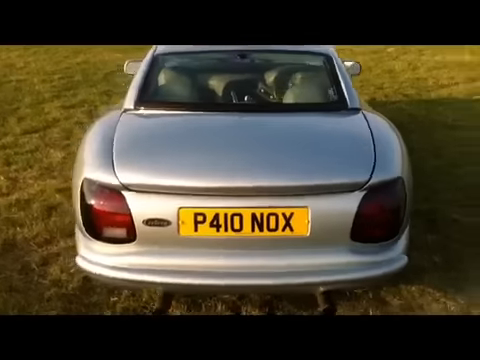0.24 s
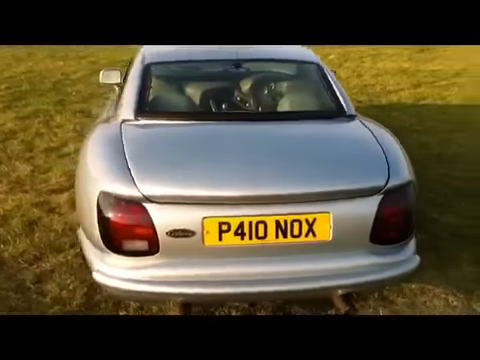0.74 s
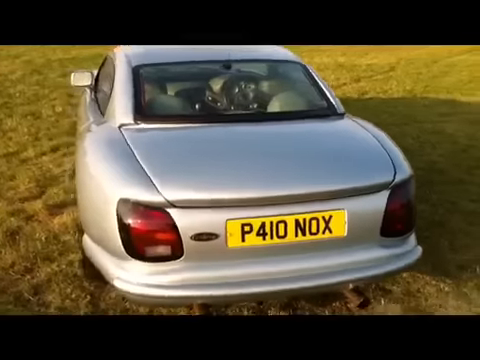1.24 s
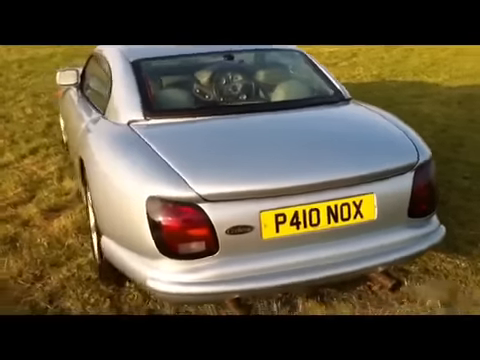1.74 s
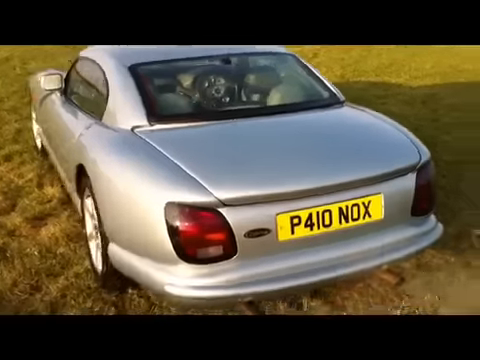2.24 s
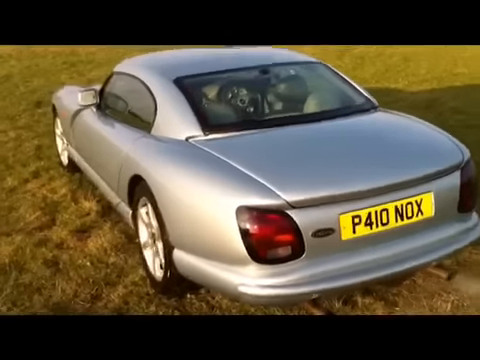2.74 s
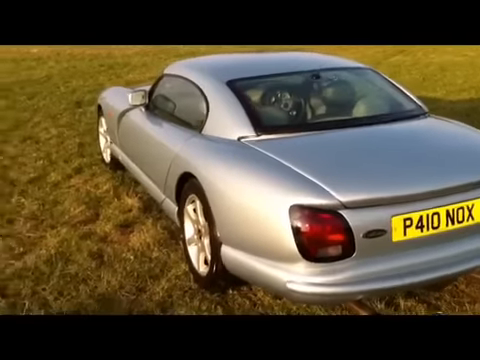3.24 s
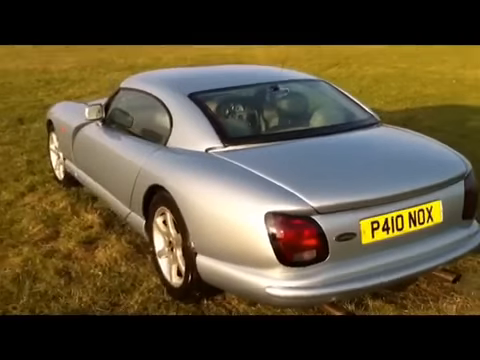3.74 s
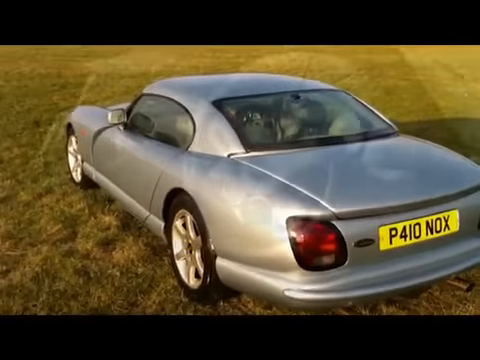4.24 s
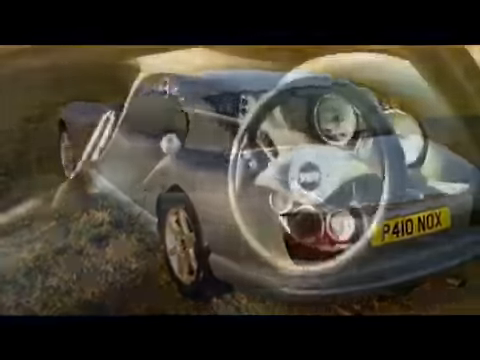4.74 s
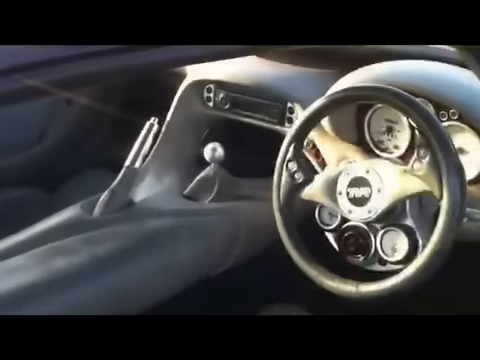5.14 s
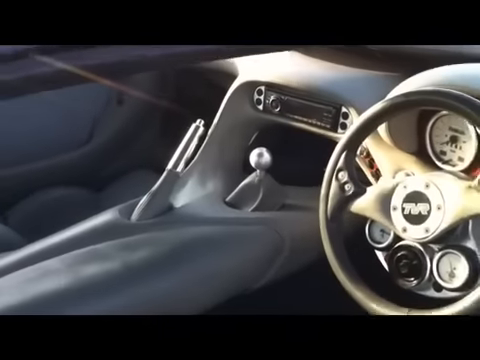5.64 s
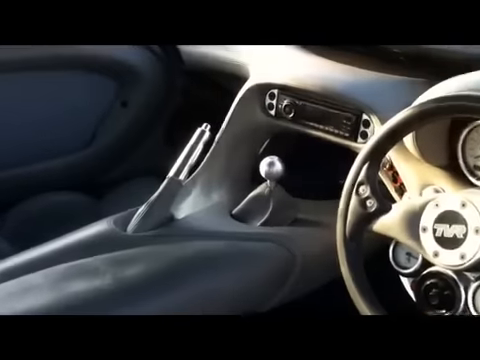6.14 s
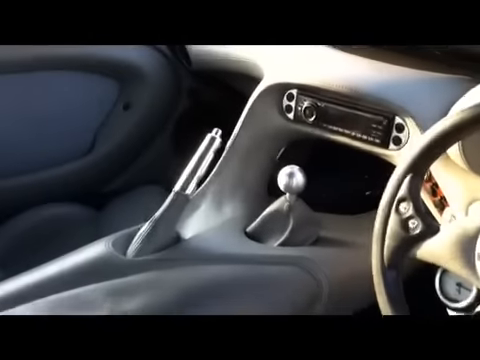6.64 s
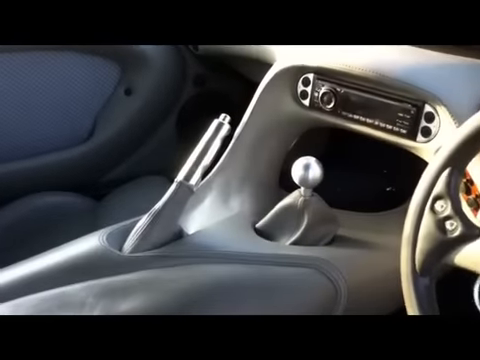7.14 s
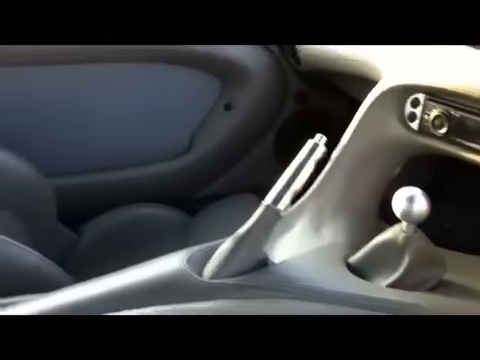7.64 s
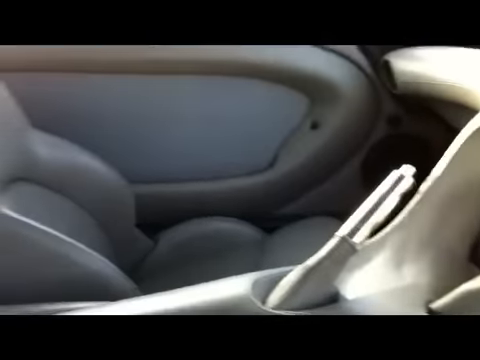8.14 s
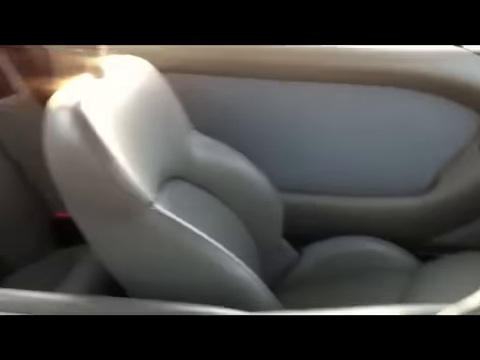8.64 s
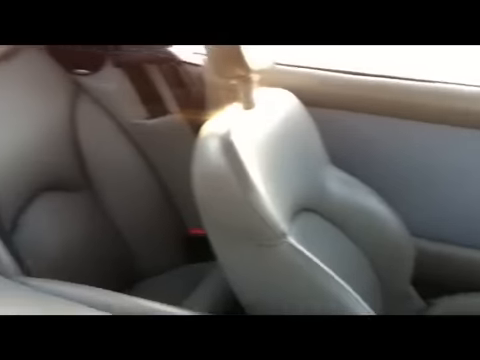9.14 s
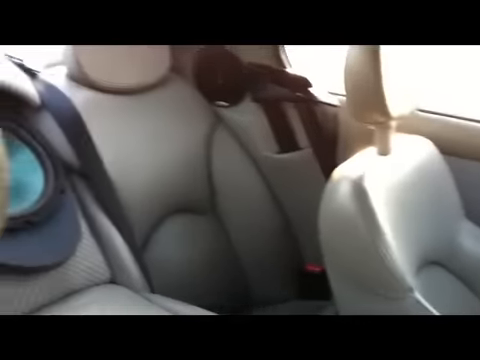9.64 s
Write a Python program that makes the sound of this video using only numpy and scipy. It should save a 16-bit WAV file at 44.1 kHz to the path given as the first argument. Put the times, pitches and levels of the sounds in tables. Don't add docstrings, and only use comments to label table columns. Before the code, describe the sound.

Outdoors on grass, a handheld microphone circles the tail pipes of an idling V8. A deep uneven burble spits and whistles, wind bursts hard on the microphone, and grass swishes and snaps underfoot. Around five seconds it crossfades to the cabin: smoother low boom, valve clatter, tappets and hiss, with two scratchy taps near the end.

```python
import sys
import numpy as np
from scipy import signal
from scipy.fft import rfft, irfft, next_fast_len
from scipy.io import wavfile
from scipy.ndimage import uniform_filter1d, minimum_filter1d, map_coordinates

SR = 44100
rng = np.random.default_rng(int(sys.argv[2]) if len(sys.argv) > 2 else 0)


def decibels_to_gain(level_db):
    exponent = np.asarray(level_db, float) / 20
    return 10 ** exponent


def output_pcm(signal):
    pcm = np.clip(np.atleast_2d(signal).T, -1, 1) * 32767
    wavfile.write(sys.argv[1], SR, np.round(pcm).astype(np.int16))


N = 435708
T = np.arange(N) / SR
CABIN_IN_S, REAR_OUT_S = 4.175, 5.17
REAR, CABIN = T < REAR_OUT_S, T > CABIN_IN_S
BOTH = np.sqrt(1. * REAR + CABIN)
REAR_HZ, CABIN_HZ = 34.61, 35.16

# start [s], peak [dB], low and high whistle [Hz].
SPIT_EVENTS = [(0.043, -40.5, 1120, 2150), (0.086, -23.5, 1200, 2630), (0.1253, -28.5, 1324, 2700),
               (0.1935, -31, 1100, 2230), (0.2637, -35.5, 1235, 2730), (0.464, -28, 1330, 2340),
               (0.5912, -28.5, 1190, 2270), (0.9323, -29.5, 1060, 2440), (1.4166, -31.5, 1865, 2820),
               (1.472, -29, 1180, 2470), (1.5196, -20.5, 1036, 2300), (1.796, -30.5, 1330, 2700),
               (1.8545, -32, 1120, 2570), (1.939, -31.5, 1596, 2700), (1.9979, -29.5, 1240, 2430),
               (2.142, -29.5, 1300, 2400), (2.2291, -28, 1190, 2610), (2.364, -29, 1370, 2420),
               (2.54, -30, 1700, 2610), (2.7159, -31.5, 1720, 3120), (2.8132, -29.5, 1376, 3040),
               (3.0592, -27, 1750, 3230), (3.186, -31, 1236, 3280), (3.4112, -26, 1113, 3100),
               (3.9833, -30.5, 1170, 2210), (4.053, -29, 1600, 3680), (4.142, -27.5, 1630, 3200),
               (4.568, -29.5, 1180, 2500), (4.835, -31.5, 1450, 2510), (5.0716, -27, 1565, 3280)]
# frequency [Hz], level [dB].
HISS_COLOUR = [(2650, -7.5), (4500, 3), (5400, 5), (5960, 4), (7970, -0.5), (9760, 2), (11500, 0.5),
               (12600, 0.5), (15600, -11.5)]


def unit(x):
    return x / np.sqrt(np.mean(x ** 2) + 1e-20)


def curves(rows):
    s, *cols = np.transpose(rows)
    return [np.interp(T, s, c) for c in cols]


def wobble(rate_hz):
    coarse = T[::32]
    knots = rng.standard_normal(int(N * rate_hz / SR) + 4)
    return np.interp(T, coarse, map_coordinates(knots, [coarse * rate_hz]))


def filtered(x, response):
    m = next_fast_len(N + SR // 2)
    return irfft(rfft(x, m) * response(np.fft.rfftfreq(m, 1 / SR)), m)[:N]


def ringing(x, modes):
    def response(f):
        total = 0
        for k, (centre, width, db) in enumerate(modes):
            damping = 1j * f * width
            total = total + (-1) ** k * decibels_to_gain(db) * damping / (centre * centre - f * f + damping)
        return total
    return filtered(x, response)


def shaped(x, spectrum):
    f, db = np.transpose(spectrum)
    return filtered(x, lambda hz: decibels_to_gain(np.interp(np.log(hz + 1), np.log(f), db)))


def noise(spectrum):
    return unit(shaped(rng.standard_normal(N), spectrum))


def patchy(x, depth_db):
    z = signal.stft(x, nperseg=512)[2]
    field = uniform_filter1d(rng.standard_normal(z.shape), size=14, axis=0)
    field = uniform_filter1d(field, size=6, axis=1)
    return unit(signal.istft(z * decibels_to_gain(depth_db * unit(field)), nperseg=512)[1][:N])


def pulses(times_s, sizes):
    return np.bincount(np.clip(np.round(times_s * SR).astype(int), 0, N - 1), sizes, N)


def dying(x, t60):
    return signal.lfilter([1], [1, -decibels_to_gain(-60 / (t60 * SR))], x)


def swells(rows, rise, fall):
    s, length, db = np.transpose(rows)[:3, ..., None]
    coarse = T[::64]
    below_db = rise * np.maximum(s - coarse, 0) + fall * np.maximum(coarse - s - length, 0)
    return coarse, decibels_to_gain(db - below_db)


def firings(bank_hz, first, lag, far_db, scatter_db, jitter):
    beats = np.arange(int(36 * N / SR))
    near = first + beats / bank_hz + 0.002074 * np.interp(beats / bank_hz, T, wobble(2.2))
    chance = rng.standard_normal((len(beats), 4))
    one = pulses(near + jitter * chance[:, 0], decibels_to_gain(scatter_db * chance[:, 1]))
    far = near + lag / bank_hz + jitter * chance[:, 2]
    other = pulses(far, decibels_to_gain(far_db + scatter_db * chance[:, 3]))
    return unit(one + other)


def engine_levels(gust_db):
    # time [s], nearness to the exhaust [dB], facing the tail pipe [dB].
    camera_path = [(0, -22, 2), (.5, -28.5, 10.5), (.8, -21.5, 0.5), (.95, -22.5, 10), (1.12, -23, 0.5),
                   (1.5, -28, 8.5), (1.7, -25, 5.5), (2.2, -22.5, 3), (2.9, -23.5, 0), (3.5, -23, 4.5),
                   (3.93, -26.5, 3.5), (4.2, -21.5, 3), (5.14, -19.5, 3), (5.2, -40, 12.5),
                   (5.3, -26.5, 6.5), (6.5, -27.5, 4), (7.6, -29, -2.5), (9.88, -27.5, -4)]
    # start [s], length [s], lift of the hiss [dB].
    swish_events = [(.205, 0.031, -0.5), (.37, 0.1, 12), (.658, 0.02, 10.5), (.93, 0.048, 7),
                    (1.23, 0.036, 8.5), (1.402, 0.3, 2.5), (1.617, 0.1, 5.5), (1.753, 0.13, 4),
                    (2.01, 0.012, 10.5), (2.154, 0.059, 10), (2.53, 0.022, 5), (2.8, 0.077, 4.5),
                    (3.054, 0.05, 3), (3.176, 0.066, 10.5), (3.381, 0.14, 9.5), (3.629, 0.071, 9.5),
                    (3.772, 0.12, 5), (3.97, 0.026, 10), (4.04, 0.3, 4.5), (5.12, 0.025, 2.5)]
    boom_db, facing_db = curves(camera_path)
    pipe_db = boom_db + facing_db
    calm_db = -26
    swing_db = uniform_filter1d(pipe_db, size=SR // 2) - calm_db
    coarse, gains = swells(swish_events, rise=800, fall=790)
    lift_db = 0.52 * np.interp(T, coarse, 20 * np.log10(np.maximum(gains.max(axis=0), 1)))
    gear_db = np.where(REAR, -41.5, -43) + np.where(REAR, 0.026, -0.14) * swing_db + lift_db
    hiss_db = np.where(REAR, -60, -56.5) + 0.24 * swing_db * ~REAR + lift_db
    excess_db = np.maximum(gust_db + 28.5, 0)
    hiss_db -= 0.069 * uniform_filter1d(excess_db, size=SR // 10) * REAR
    overlap_db = 4
    return boom_db, pipe_db, gear_db, hiss_db + overlap_db * (REAR & CABIN)


def exhaust(rear, cabin, boom_db, pipe_db):
    # frequency [Hz], width [Hz], level [dB].
    boom_modes = [(77.8, 27, -23), (100.4, 43, -7.5), (137.1, 24.4, 2), (168.8, 36.4, 3)]
    pipe_modes = [(221, 42, -1.5), (255.1, 46.8, 1), (329.4, 158, -12), (379, 140, -20.5)]
    cabin_boom_modes = [(68.8, 12, -10), (111.3, 60, -7), (149.8, 22, 2.5), (183, 42.5, 2),
                        (246.5, 177, -3.5)]
    cabin_pipe_modes = [(228.3, 58, -5), (248.2, 39.3, 0), (306, 20.6, -21), (377, 49, -16)]
    # start [s], peak [dB].
    rear_lumps = [(0.055, -2), (0.186, -9), (0.234, -12), (0.273, -15.5), (0.357, -7.5), (0.446, 2),
                  (0.52, -11.5), (0.705, -20), (0.746, -11.5), (0.822, -21), (1.249, -20.5), (1.278, -15),
                  (1.322, -1.5), (1.433, -7.5), (1.473, -0.5), (1.598, -6), (1.65, -7), (1.696, -12),
                  (1.729, -6.5), (1.795, -10.5), (2.011, -4), (2.142, -10.5), (2.229, -4), (2.366, -7),
                  (2.405, -6.5), (2.46, -12), (2.604, -5.5), (2.698, -10.5), (2.756, -8), (2.92, -8.5),
                  (3.012, -5.5), (3.056, -5.5), (3.184, -5.5), (3.267, -11), (3.308, -12), (3.402, -8.5),
                  (3.503, -11.5), (3.616, -10.5), (3.772, -6.5), (3.84, -11), (3.964, -5.5), (4.051, -5),
                  (4.188, 1.5), (4.566, -6), (4.669, -5), (4.73, -12), (4.909, -1.5), (5.015, -11.5),
                  (5.114, 1)]
    cabin_lumps = [(5.237, -5.5), (5.388, -9), (5.495, -14), (5.912, -9.5), (5.953, -8.5), (6.036, -6),
                   (6.096, -20), (6.148, -6), (6.193, -5), (6.387, -6.5), (6.498, -15.5), (6.711, -12.5),
                   (6.837, -11.5), (6.871, -19), (6.949, -10), (7.097, -14), (7.238, -18), (7.551, -16.5),
                   (7.63, -14.5), (7.714, -16), (7.803, -19), (7.942, -18.5), (8.005, -14.5),
                   (8.087, -16.5), (8.23, -15.5), (8.37, -19.5), (8.551, -19), (8.578, -17), (8.698, -13.5),
                   (8.782, -13), (8.894, -17), (9.112, -13.5), (9.156, -16.5), (9.236, -20.5),
                   (9.355, -15.5), (9.591, -17.5), (9.706, -19), (9.79, -16)]
    # multiple of a bank's rate, rear level [dB], cabin level [dB].
    hum_orders = [(2, -37, -26), (3, -11, -19.5), (4, -11.5, -9.5), (5, -8.5, -20.5)]
    s, db = np.transpose(SPIT_EVENTS)[:2]
    strong = decibels_to_gain(25.5) * pulses(s, decibels_to_gain(db + 35.0) ** 0.24)
    rear = -(rear + strong + lumps_of(rear_lumps, pipe_db)) + 0.35 * rng.standard_normal(N)
    cabin = cabin + lumps_of(cabin_lumps, pipe_db) + 0.41 * rng.standard_normal(N)

    def dull(x):
        return unit(filtered(x, lambda f: 1 / (1 + 1j * f / 420) ** 3))

    boom = dull(ringing(rear, boom_modes)) * REAR + dull(ringing(cabin, cabin_boom_modes)) * CABIN
    pipe = dull(ringing(rear, pipe_modes)) * REAR + dull(ringing(cabin, cabin_pipe_modes)) * CABIN
    orders, rear_db, cabin_db = np.transpose(hum_orders)
    hum = shake(REAR_HZ, orders, rear_db) * REAR + shake(CABIN_HZ, orders, cabin_db) * CABIN
    steady_db = uniform_filter1d(boom_db, size=SR // 2)
    mix = decibels_to_gain(boom_db) * boom + decibels_to_gain(pipe_db) * (.8 * pipe + drone()) + decibels_to_gain(steady_db) * hum
    return mix / BOTH


def lumps_of(rows, pipe_db):
    s, db = np.transpose(rows)
    return pulses(s, decibels_to_gain(17 + db - np.interp(s, T, pipe_db)))


def drone():
    hz = 247.9 + 7.5 * (wobble(3) + 0.4005 * wobble(25))
    return decibels_to_gain(-4.5 + wobble(15)) * np.sin(2 * np.pi * np.cumsum(hz) / SR)


def shake(bank_hz, orders, levels_db):
    turn = 2 * np.pi * bank_hz * T + 0.44 * wobble(3)
    return sum(decibels_to_gain(db) * np.sin(order * turn) for order, db in zip(orders, levels_db))


def spits():
    # frequency [Hz], width [Hz], level [dB].
    nozzle_modes = [(1550, 320, 8.5), (2700, 1030, -0.5), (4270, 740, -2)]
    s, db = np.transpose(SPIT_EVENTS)[:2]
    high_db = -37 + 6 * rng.standard_normal(len(s))
    nozzle = unit(ringing(rng.standard_normal(N), nozzle_modes))
    jet = nozzle * dying(pulses(s, decibels_to_gain(db - 7.0)), t60=0.063)
    hiss_size = dying(pulses(s, decibels_to_gain(db + high_db - 18.0)), t60=.05)
    jet += noise(HISS_COLOUR) * uniform_filter1d(hiss_size, size=90)
    t = T[:SR // 20]
    for at_s, level_db, low_hz, high_hz in SPIT_EVENTS:
        flutter = np.cumsum(rng.normal(0, 0.08, (2, len(t))), axis=1)
        low = decibels_to_gain(level_db - 4.0 - 60 * t / 0.074) * np.sin(2 * np.pi * low_hz * t + flutter[0])
        high = decibels_to_gain(level_db - 10.5 - 60 * t / 0.045) * np.sin(2 * np.pi * high_hz * t + flutter[1])
        jet[round(at_s * SR):][:len(t)] += (low + high) * (1 - np.exp(-t / 0.00034))
    return jet


def spatter(rear):
    # time [s], comb pitch [Hz].
    comb_path = [(1, 1334), (2.3, 1390), (3.1, 1632), (5.2, 1686)]
    # multiple of the comb pitch, level [dB].
    whistle_parts = [(1, 3.5), (2.02, -2.5), (3, -11.5), (4.3, -19)]
    # start [s], peak [dB], whistle [Hz].
    crack_events = [(1.0427, -28, 1250), (1.07, -32, 1240), (1.0999, -32, 1740), (1.1883, -29, 1240),
                    (1.6482, -31, 1300), (1.6656, -30, 1640), (1.7045, -28, 1200), (1.763, -41.5, 1110),
                    (1.8243, -36, 1700), (1.882, -30, 1640), (1.9115, -24.5, 1260), (2.0217, -26, 1190),
                    (2.084, -32, 1390), (2.317, -30, 1520), (2.4038, -28, 1300), (2.4329, -28.5, 1420),
                    (2.5203, -26, 1375), (2.6075, -31, 1560), (2.694, -29, 1257), (2.7806, -27, 1270),
                    (2.8404, -30.5, 1760), (3.042, -29.5, 1740), (3.234, -30.5, 1610), (3.272, -25, 1570),
                    (3.446, -26, 1374), (3.5014, -30, 1770), (3.5593, -31, 1145), (3.6168, -29, 1260),
                    (3.7834, -30, 1470), (3.9225, -36, 1080)]
    fired = np.flatnonzero(rear[:round(REAR_OUT_S * SR)])
    s, db, own_hz = np.transpose(crack_events)
    at_s = np.concatenate([fired / SR, s])
    comb = np.interp(at_s, *np.transpose(comb_path))[:, None]
    pitch = np.concatenate([comb[:len(fired), 0], own_hz])[:, None]
    loose = np.concatenate([np.ones(len(fired)), np.full(len(s), .3)])[:, None]
    at = np.concatenate([fired, np.round(s * SR).astype(int)])
    fired_db = -45.5 + 30 * np.log10(rear[fired] / rear[fired].mean())
    level_db = np.concatenate([fired_db, db - 4])[:, None]
    t, out = T[:SR // 60], np.zeros(N)
    flutter = np.cumsum(rng.normal(0, .055, (len(at), len(t))), axis=1)
    place = (at[:, None] + np.arange(len(t))).ravel()
    for k, (multiple, own_db) in enumerate(whistle_parts):
        chance = rng.standard_normal((len(at), 2))
        base_hz, spread = (comb, .035) if k else (pitch, .1)
        hz = multiple * base_hz * np.exp(spread * loose * chance[:, :1])
        size = decibels_to_gain(level_db + own_db + 3.6 * loose * chance[:, 1:] - 60 * t / 0.026)
        size = size * (1 - np.exp(-t / 0.0013))
        whistle = size * np.sin(2 * np.pi * hz * t + multiple * flutter)
        out += np.bincount(place, whistle.ravel(), N)
    return out


def belt():
    # frequency [Hz], width [Hz], level [dB].
    belt_modes = [(2400, 150, 0)]
    # time [s], level [dB].
    belt_path = [(.6, -9.5), (2.0, 5.5)]
    level_db = -61 + curves(belt_path)[0] + 0.88 * wobble(5.9)
    return decibels_to_gain(level_db) * unit(ringing(rng.standard_normal(N), belt_modes)) * REAR


def valve_gear(rear, pipe_db, gear_db, hiss_db):
    # frequency [Hz], level [dB].
    rear_colour = [(240, -6), (400, 5), (459, -9.5), (664, -14), (874, -10.5), (1630, -13), (2100, -19),
                   (2390, -36), (2740, -25), (5000, -26.5), (6500, -38), (11000, -120)]
    cabin_colour = [(210, -14.5), (350, 0), (374, 2), (423, -6.5), (511, -5), (577, -8), (682, -7.5),
                    (901, -15), (1110, -13), (2220, -25), (2510, -23.5), (5000, -39), (6500, -74),
                    (11000, -120)]
    # frequency [Hz], width [Hz], level [dB].
    tappet_modes = [(1120, 30, 6.5), (1330, 164, 2), (2540, 140, -13), (3220, 600, -11.5)]
    beat = (1 + 0.74 * unit(dying(rear, t60=0.056))) * decibels_to_gain(0.67 * wobble(9.7))
    depth_db = (1.4 + .7 * wobble(4)) * np.interp(T, [6.3, 7.5], [1, .45])
    cycle = decibels_to_gain(depth_db * np.cos(np.pi / 2 * 34.9 * (T - .082)))
    gear = unit(beat * noise(rear_colour)) * REAR
    gear += decibels_to_gain(6.5) * unit(cycle ** 0.85 * decibels_to_gain(1.4 * wobble(45)) * noise(cabin_colour)) * CABIN
    hiss = unit(beat ** 0.26 * decibels_to_gain(.7 * wobble(36))) * REAR + unit(cycle * decibels_to_gain(wobble(11))) * CABIN
    hiss = hiss * patchy(noise(HISS_COLOUR), depth_db=2.1)
    ticks = cycle ** 2 * decibels_to_gain(1.8 * wobble(60)) * rng.standard_normal(N)
    tappets = unit(ringing(ticks, tappet_modes))
    open_door_db = uniform_filter1d(pipe_db, size=SR // 3)
    clatter = (decibels_to_gain(gear_db) * gear + decibels_to_gain(hiss_db) * hiss) / BOTH
    return clatter + decibels_to_gain(open_door_db - 24.5) * tappets * CABIN


def gusts():
    gust_events = [(0, 0.034, -14.5, 13.5), (0.101, 0.04, -13.5, 10), (0.185, 0.1, -33, 11),
                   (0.348, .14, -18.5, 8.5), (0.492, 0.038, -17.5, -34), (0.58, 0.036, -14, -6),
                   (0.698, 0.13, -22, 2.5), (0.898, 0.065, -18.5, 6), (0.993, 0.075, -40, -9),
                   (1.221, 0.028, -23, -6), (1.364, 0.024, -32, 5), (1.452, 0.077, -20.5, 0.5),
                   (2.139, 0.03, -22.5, -12), (2.228, 0.042, -26.5, 4), (2.574, 0.069, -43.5, -6),
                   (2.783, 0.018, -35.5, -9), (2.934, 0.026, -32, -15), (3.008, 0.018, -23.5, -30),
                   (3.305, 0.014, -33, 8), (3.406, 0.049, -22.5, -10), (4.222, 0.13, -41, 6),
                   (4.574, 0.052, -36, 10), (4.713, 0.097, -31, 3.5), (4.853, 0.13, -32.5, -2),
                   (5.022, 0.25, -34, 3)]
    reach_grows = 0.28
    coarse, gains = swells(gust_events, rise=690, fall=400)
    strength = gains.sum(axis=0) + decibels_to_gain(-43)
    strength_db = 20 * np.log10(strength)
    _, _, top_db, reach_db = np.transpose(gust_events)
    reach_db = (reach_db - reach_grows * top_db) @ gains / strength
    reach_db = reach_db + reach_grows * strength_db * gains.sum(axis=0) / strength
    return np.interp(T, coarse, strength_db), np.interp(T, coarse, reach_db)


def wind(gust_db, reach_db):
    # start [s], peak [dB], brightness [dB].
    tail_eddies = [(0.016, -19, 17), (0.045, -13, 12), (0.058, -15, 6), (0.089, -6.5, 20),
                   (0.097, -20, 29.5), (0.125, -12, 1), (0.154, -8.5, -5), (0.196, -10, 7), (0.206, -14, 6),
                   (0.235, -18, 3), (0.245, -14, 13), (0.265, -9, 9), (0.275, -26, 0), (0.342, -11.5, -2),
                   (0.355, -11.5, 10.5), (0.368, -6, 13.5), (0.399, -15.5, -9), (0.424, -12.5, 7.5),
                   (0.449, -10.5, 10), (0.467, -10.5, 13.5), (0.501, -14, -10), (0.572, -6.5, -6),
                   (0.592, -4, 6.5), (0.605, -15.5, 8.5), (0.622, -21, 5), (0.651, -16, 6), (0.665, -16, 0),
                   (0.698, -9.5, 2), (0.725, -22, 10), (0.748, -19, 4.5), (0.786, -13.5, 1.5),
                   (0.797, -18, 0), (0.868, -24, 6), (0.904, -26.5, 12), (0.917, -17.5, 0),
                   (0.944, -18.5, 11), (0.956, -19, -6), (0.963, -14.5, -1.5), (1.223, -19.5, -8),
                   (1.254, -24, 11), (1.274, -14, -4), (1.377, -22, 8.5), (1.387, -5.5, -9),
                   (1.453, -25.5, -4), (1.478, -19, -7), (1.499, -12.5, 7.5), (1.544, -29, 1.5)]
    flank_eddies = [(2.086, -22.5, -13), (2.144, -17, -10), (2.214, -30, -10), (2.229, -17, -11),
                    (2.251, -14, -11), (2.293, -17, -8), (2.41, -25, 6), (2.449, -28, -6),
                    (3.010, -31, -20), (3.387, -27.5, -12), (3.409, -19.5, 0), (3.464, -24, -14),
                    (3.478, -30.5, -15), (4.484, -20, 6), (4.588, -20.5, -5), (4.699, -26, -1),
                    (4.808, -30, 1), (4.826, -18.5, 4), (4.915, -26, -1), (4.946, -18, -14),
                    (4.973, -18.5, -6), (5.021, -27, 2), (5.033, -14.5, -8), (5.047, -11.5, 0),
                    (5.092, -15.5, -2), (5.151, -14, -18)]
    # start [s], peak [dB].
    slap_events = [(0.02, -17), (0.0907, -11.5), (.128, -22.5), (.156, -15.5), (0.5992, -18), (0.9588, -15),
                   (0.9671, -11), (1.5202, -4), (2.1436, -22.5), (2.2155, -25.5), (2.2949, -23.5),
                   (3.479, -30), (0.357, -17.5), (3.0144, -31.5), (5.051, -25.5)]
    # frequency [Hz], level [dB].
    buffet_colour = [(60, -50), (130, 3.5), (260, 7), (430, 1), (700, -9.5), (1050, -16.5), (2000, -34.5),
                     (3500, -52), (6000, -77.5)]
    s, db, bright_db = np.transpose(tail_eddies + flank_eddies)
    slap_s, slap_db = np.transpose(slap_events)
    slaps = pulses(slap_s, decibels_to_gain(slap_db + 33.5))
    air = rng.standard_normal(N)
    scale = 1 / np.std(shaped(air, buffet_colour))

    def treble(x):
        return filtered(x, lambda f: (f / 750) ** 3 / (1 + (f / 750) ** 3))

    def burst(size):
        swell = dying(pulses(s + 0.0022, size * decibels_to_gain(5)), t60=0.032)
        return uniform_filter1d(swell, size=170) * air - pulses(s + 0.003043, size * decibels_to_gain(23))

    tumble = unit(decibels_to_gain(11 * np.tanh(.25 * wobble(40) + .5 * wobble(160))))
    low = scale * shaped(decibels_to_gain(gust_db + 2.0) * tumble * air * REAR, buffet_colour)
    body = shaped(burst(decibels_to_gain(db)) - slaps, buffet_colour)
    edge = shaped(burst(decibels_to_gain(db) * (decibels_to_gain(bright_db) - 1)) - decibels_to_gain(-8) * slaps, buffet_colour)
    return low + (decibels_to_gain(reach_db) - 1) * treble(low) + scale * (body + treble(edge))


def snaps():
    # start [s], peak [dB], lean to the treble [dB].
    snap_events = [(0.0892, -38, 2), (0.1276, -43, 2), (0.193, -44, -1), (0.2094, -40, -0.5),
                   (0.2214, -35, -6), (0.3631, -37, 4), (0.388, -30.5, 0.5), (0.4479, -38, 1),
                   (0.5003, -30.5, -3.5), (0.8719, -37.5, -6.5), (0.9168, -41, 0.5), (0.9383, -46, 1),
                   (0.9532, -28, -2.5), (1.072, -45, -3), (1.0994, -46, 2), (1.2341, -45, -2),
                   (1.2974, -41, 1.5), (1.4127, -33, 1.5), (1.474, -39.5, -3), (1.6242, -35, 0),
                   (1.6477, -37, -1), (1.6816, -30.5, 0), (1.707, -28.5, -4), (1.7629, -33, 0),
                   (1.7858, -30.5, -3), (1.8532, -45, 1), (1.9121, -48, -3), (1.9984, -45, 0),
                   (2.0158, -37.5, 2), (2.0837, -37, -2), (2.161, -39, 3), (2.2288, -42, 5),
                   (2.366, -42, 5), (2.4603, -42.5, -0.5), (2.5381, -46, 4), (2.609, -36.5, -0.5),
                   (2.7886, -43, 0), (3.0604, -37, 1.5), (3.1832, -34, -3), (3.4077, -38.5, 1),
                   (3.4805, -35.5, 3), (3.5004, -39, 3), (3.5813, -40.5, 0), (3.6381, -38, 2),
                   (3.7768, -41, -3), (3.8087, -38, 2), (3.9818, -37, 0), (4.0527, -42, 3),
                   (4.1135, -34, 2), (4.1739, -44, 0), (4.9107, -39, 0), (5.1477, -29, -1)]
    s, db, lean_db = np.transpose(snap_events)
    hiss = noise(HISS_COLOUR)
    top = filtered(hiss, lambda f: 1 / (1 + (6200 / (f + 1)) ** 6))

    def envelope(level_db):
        return uniform_filter1d(dying(pulses(s + 0.0012, decibels_to_gain(level_db - 10)), t60=0.036), size=130)

    return envelope(db - lean_db) * (hiss - top) + envelope(db + lean_db) * top


def handling():
    # start [s], peak [dB], low part [dB].
    tap_events = [
        (8.7217, -24, -10),
        (9.2731, -26.5, -3.5),
    ]
    # frequency [Hz], level [dB].
    scratch_colours = [
        [(1060, -40), (1800, -18), (2790, -6), (3310, 2), (3930, -23), (4320, 6), (4960, -7), (7110, -9.5),
         (14000, -29.5)],
        [(710, -23), (1200, 1.5), (1700, -16), (3250, -10), (3830, -15.5), (6680, -17), (11300, -43),
         (13200, -48), (14000, -50)],
    ]
    s, db, low_db = np.transpose(tap_events)
    scratch = np.zeros(N)
    for k, colour in enumerate(scratch_colours):
        scratch += noise(colour) * dying(pulses(s[k:k + 1], decibels_to_gain(db[k:k + 1] - 7.0)), t60=0.059)
    thud = noise([(400, 4.0), (900, 9.0), (1500, 3.0), (3000, -15.0), (5000, -43.5)])
    thud_size = dying(pulses(s, decibels_to_gain(db + low_db + 5.5)), t60=0.072)
    knock = thud * uniform_filter1d(thud_size, size=500)
    shell = ringing(pulses(s[1:] + 0.0055, decibels_to_gain(db[1:] + 34.5)), [(1300, 120, 0)])
    return scratch + knock + shell


def thumps():
    # time [s], level [dB].
    thump_events = [(.08, -40), (.2, -39), (.47, -41), (.95, -27), (4.18, -35), (4.28, -34), (5.15, -30),
                    (9.86, -50)]
    s, db = np.transpose(thump_events)
    t = T[:SR // 10] - T[SR // 20]
    push = decibels_to_gain(-9 * (t / 0.012) ** 2) * np.cos(2 * np.pi * 22 * t)
    return signal.oaconvolve(pulses(s, decibels_to_gain(db)), push, "same")


def background():
    rumble_db = np.where(REAR, -60, -72) + 3 * wobble(6)
    rumble = decibels_to_gain(rumble_db) * noise([(10, -6), (60, 3), (120, -27)])
    return rumble + decibels_to_gain(-81) * np.sin(2 * np.pi * 15000.1 * T)


def scene():
    rear = firings(REAR_HZ, first=0.00157, lag=0.4043, far_db=-1.5, scatter_db=3.0, jitter=0.001)
    cabin = firings(CABIN_HZ, first=0.01004, lag=0.3483, far_db=-2.5, scatter_db=3.0, jitter=0.001)
    gust_db, reach_db = gusts()
    boom_db, pipe_db, gear_db, hiss_db = engine_levels(gust_db)
    engine = exhaust(rear, cabin, boom_db, pipe_db) + spits() + spatter(rear) + belt()
    engine += valve_gear(rear, pipe_db, gear_db, hiss_db)
    air = engine + wind(gust_db, reach_db) + snaps() + handling()
    cut = filtered(air, lambda f: (1j * f / 63) ** 8 / (1 + 1j * f / 63 - (f / 63) ** 2) ** 4)
    return (cut + thumps() + background())[None]


def gated_treble(x):
    # frequency [Hz], limit [dB].
    gate_limits = [(4000, -16), (7300, -9), (9500, -10), (13000, -6.5), (14500, -4.5), (15750, -2)]
    hz, _, z = signal.stft(x, SR, nperseg=2048)
    power = np.abs(z) ** 2 + 1e-20
    band_db = 10 * np.log10(uniform_filter1d(power, size=9, axis=0))
    loud_db = 10 * np.log10(uniform_filter1d(power.sum(axis=0), size=5))
    edge_hz, edge_db = np.transpose(gate_limits)
    limit_db = np.interp(hz, edge_hz, edge_db, left=-99, right=99)[:, None]
    limit_db = limit_db + 0.41 * (loud_db - loud_db.mean())
    usual_db = np.median(band_db, axis=1)[:, None]
    return signal.istft(z * (band_db - usual_db > limit_db), nperseg=2048)[1][:N]


def band_limit(x):
    return signal.sosfilt(signal.butter(12, 15720, fs=SR, output="sos"), x)


def record(dry):
    ceiling = .71
    need = np.minimum(1, ceiling / (np.abs(dry[0]) + 1e-9))
    gain = uniform_filter1d(minimum_filter1d(need, size=401), size=201)
    ends = np.minimum(1, np.minimum(N - np.arange(N), np.arange(N)) / 150)
    mix = gated_treble(dry[0]) * gain * ends
    return band_limit(mix[None])


dry = scene()
out = record(dry)
output_pcm(out)
```